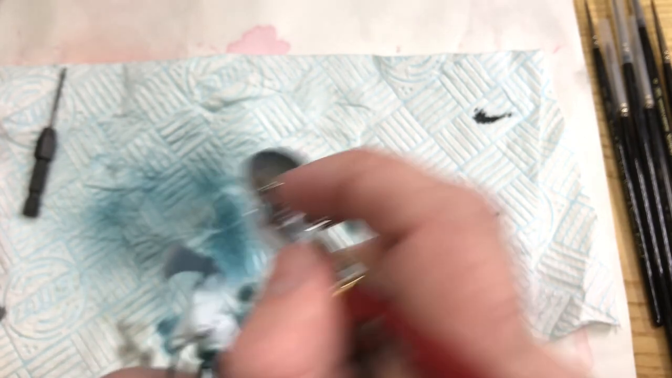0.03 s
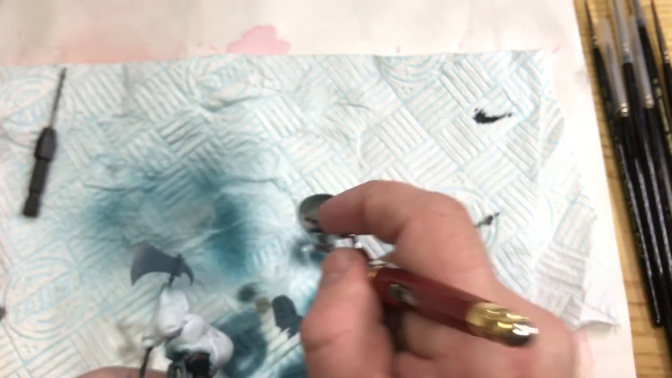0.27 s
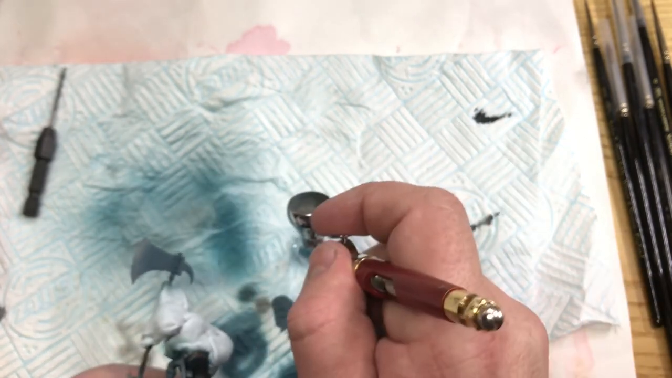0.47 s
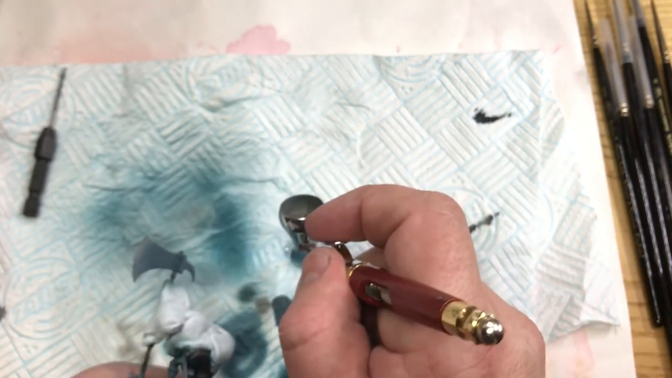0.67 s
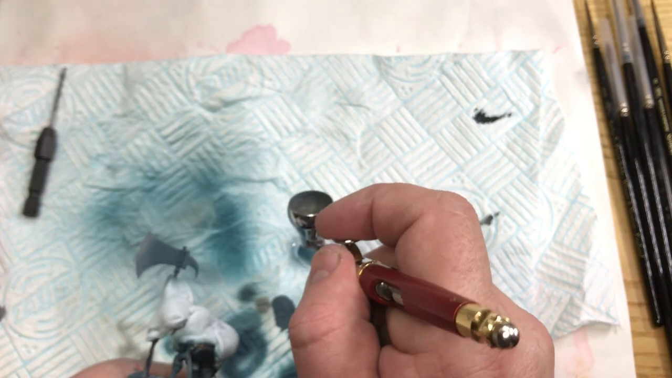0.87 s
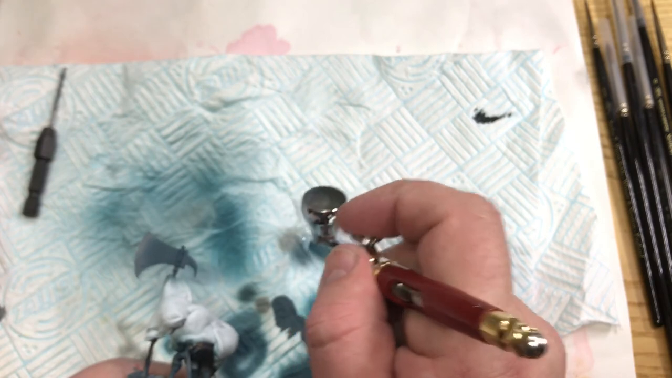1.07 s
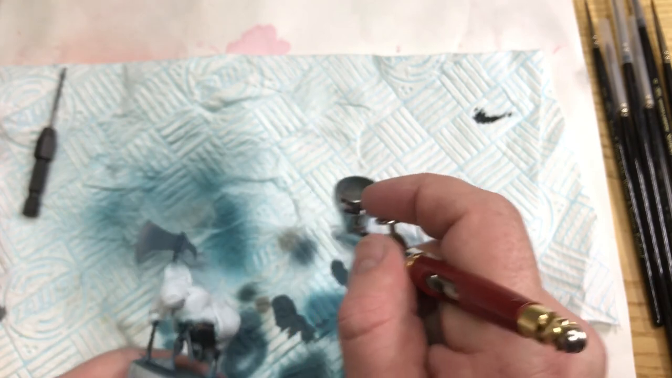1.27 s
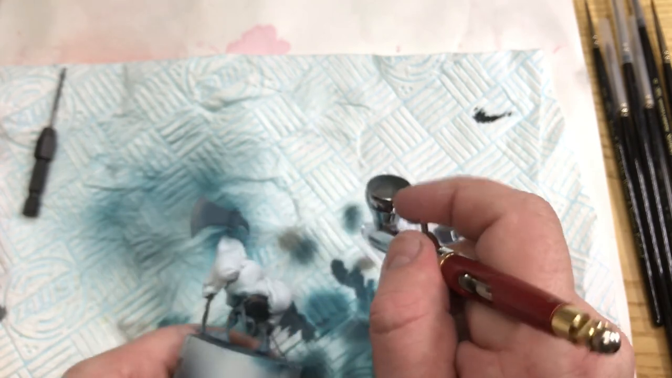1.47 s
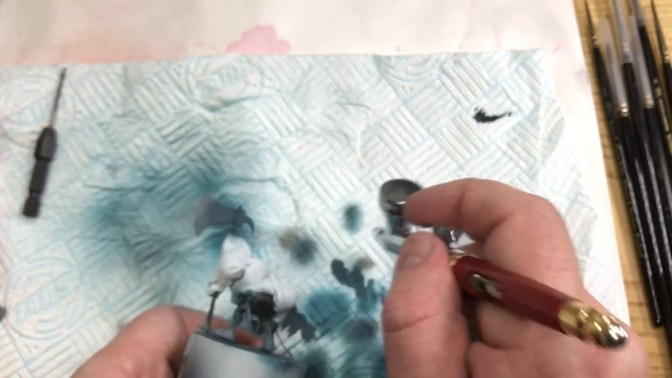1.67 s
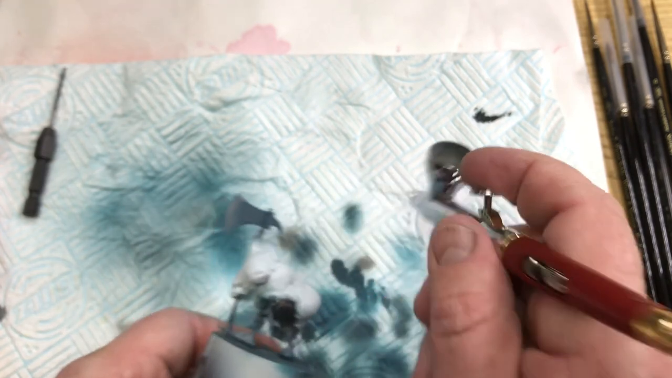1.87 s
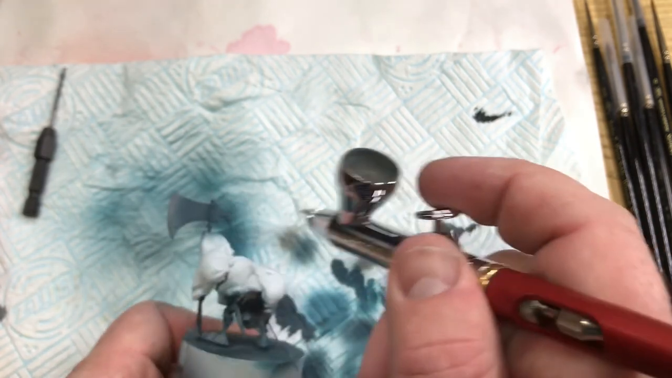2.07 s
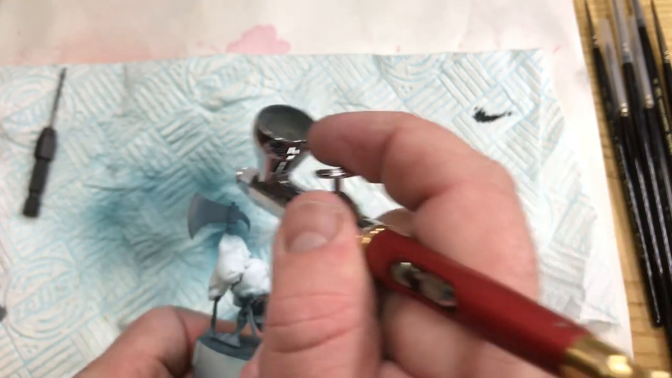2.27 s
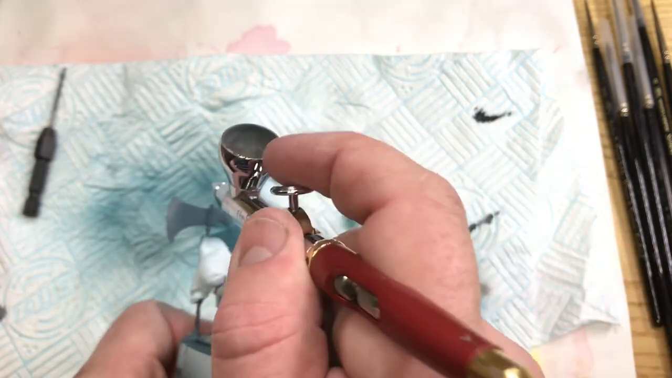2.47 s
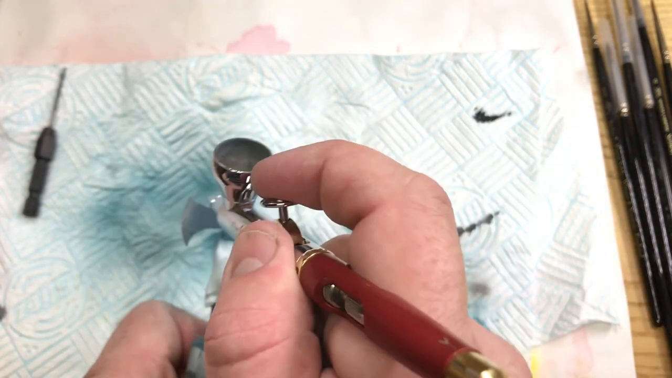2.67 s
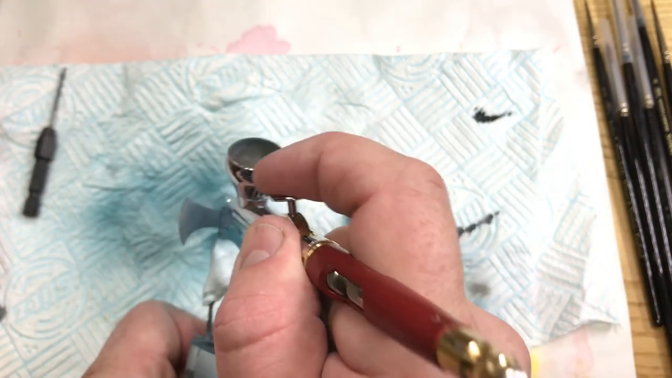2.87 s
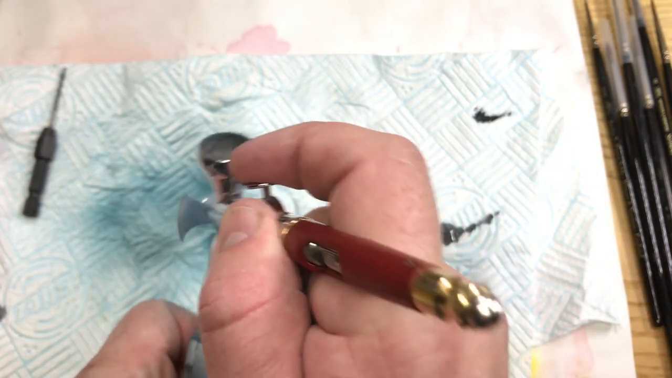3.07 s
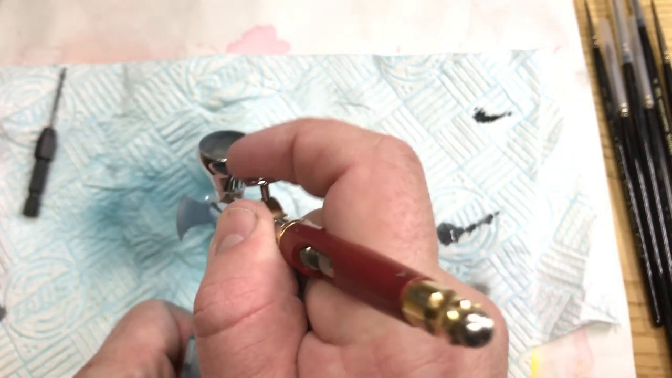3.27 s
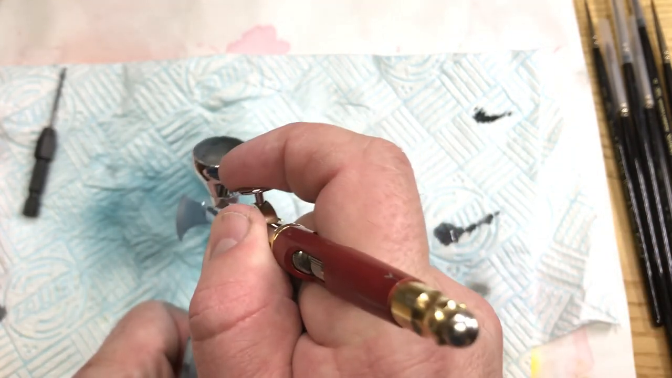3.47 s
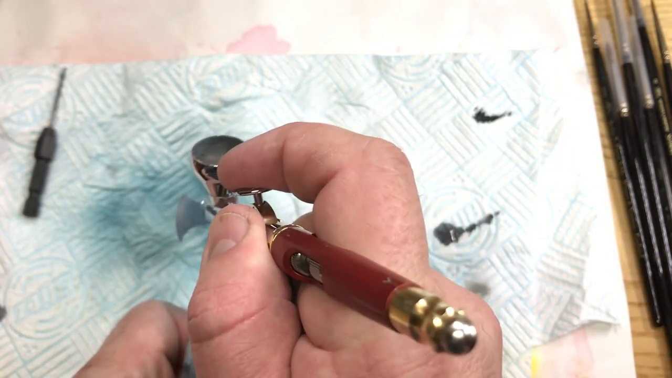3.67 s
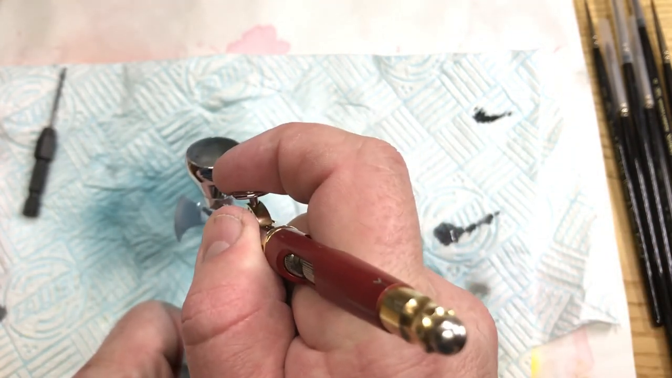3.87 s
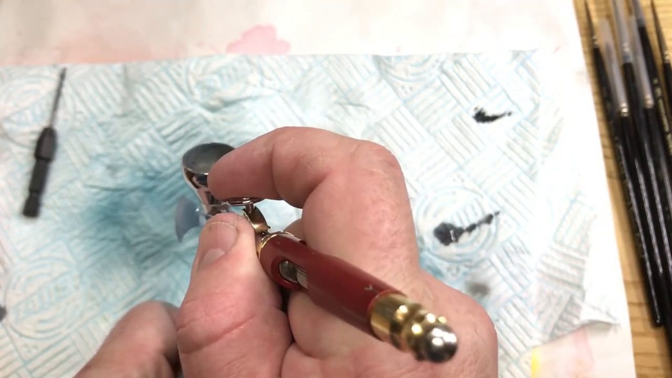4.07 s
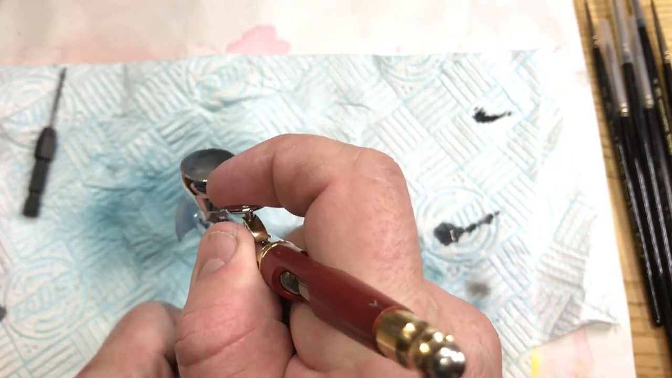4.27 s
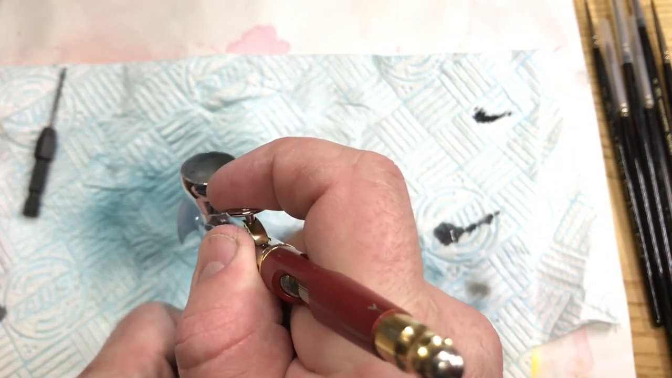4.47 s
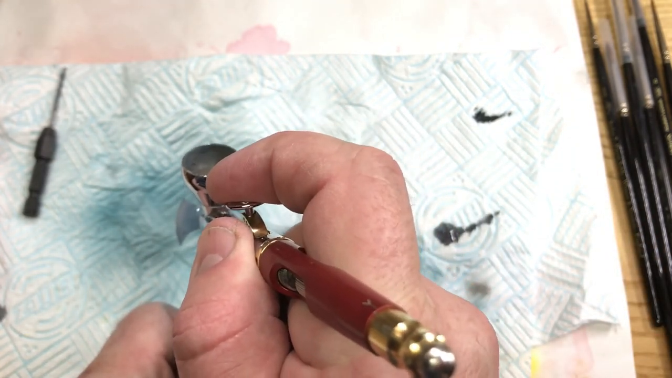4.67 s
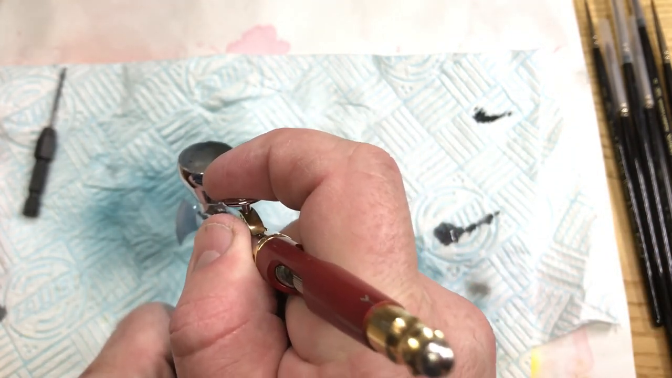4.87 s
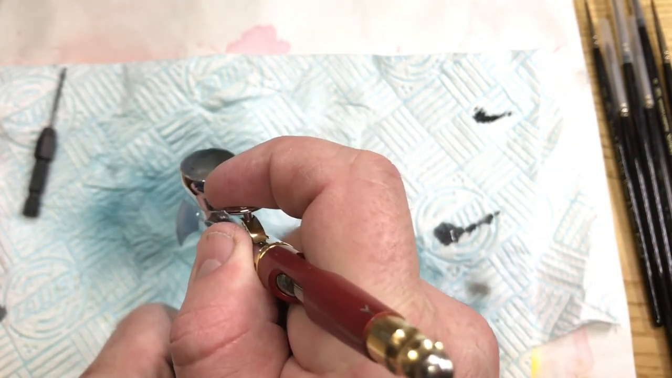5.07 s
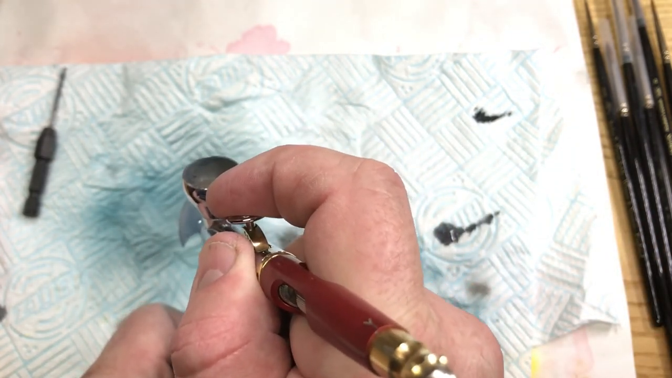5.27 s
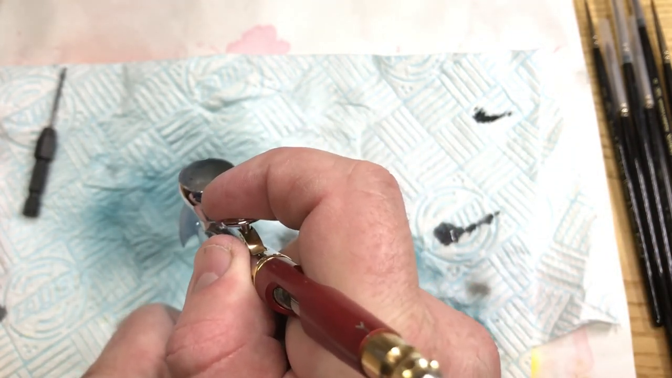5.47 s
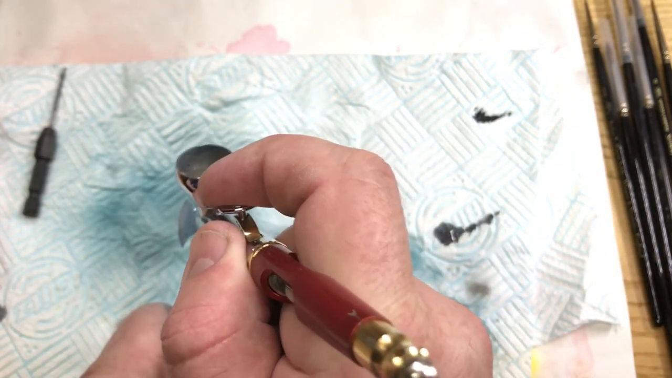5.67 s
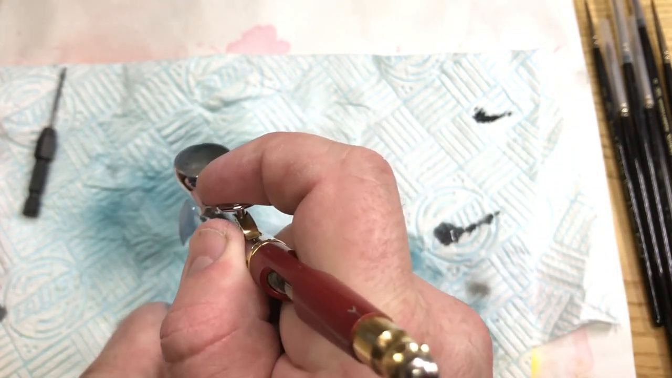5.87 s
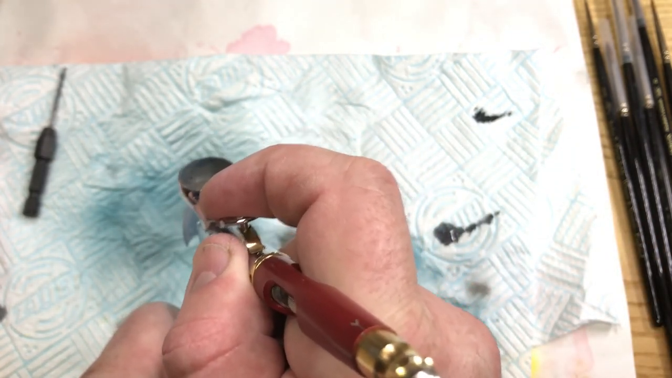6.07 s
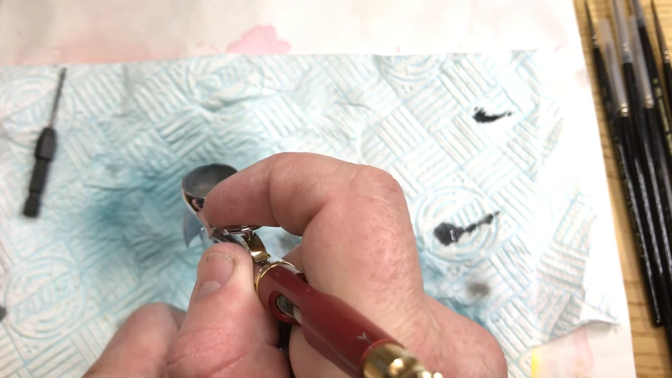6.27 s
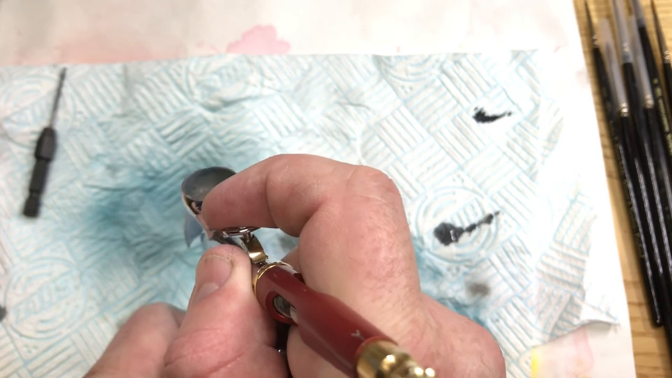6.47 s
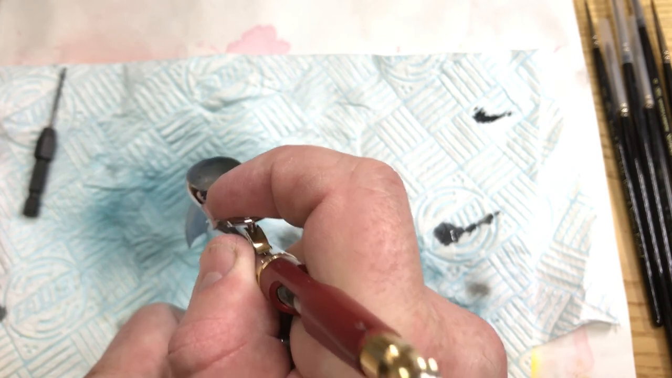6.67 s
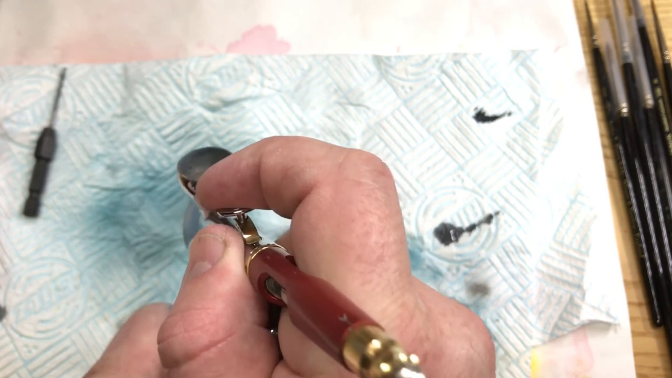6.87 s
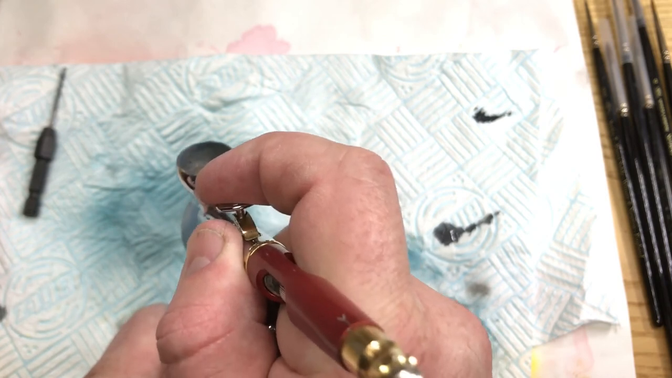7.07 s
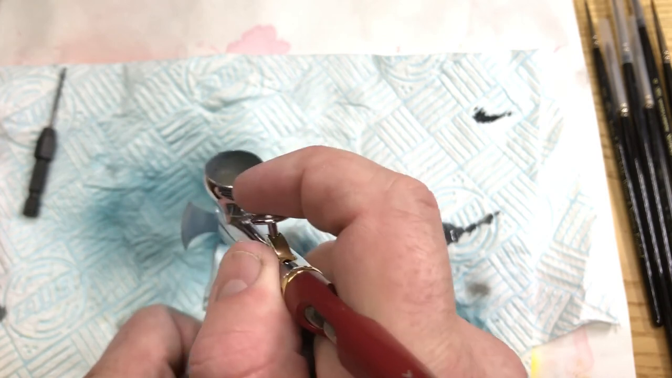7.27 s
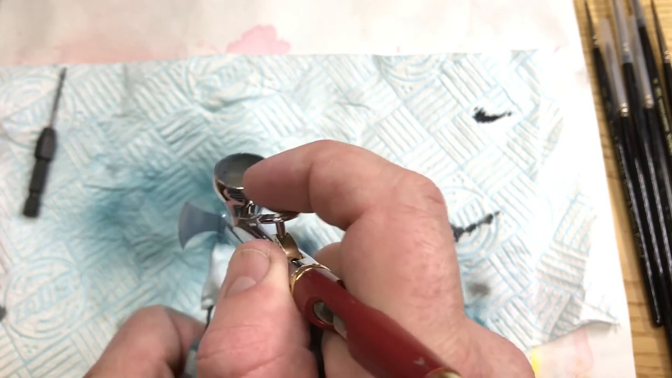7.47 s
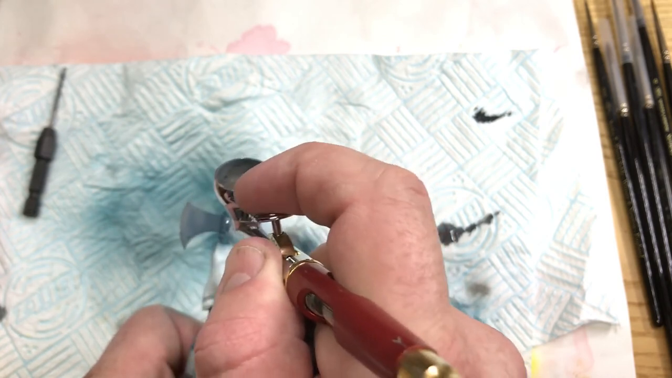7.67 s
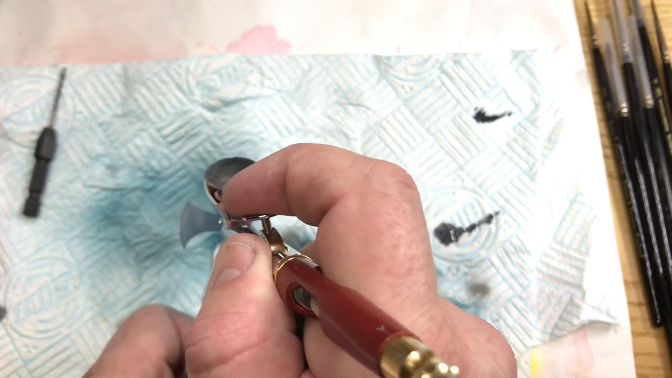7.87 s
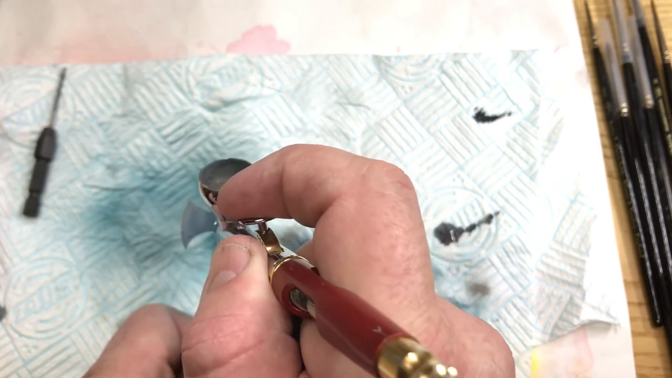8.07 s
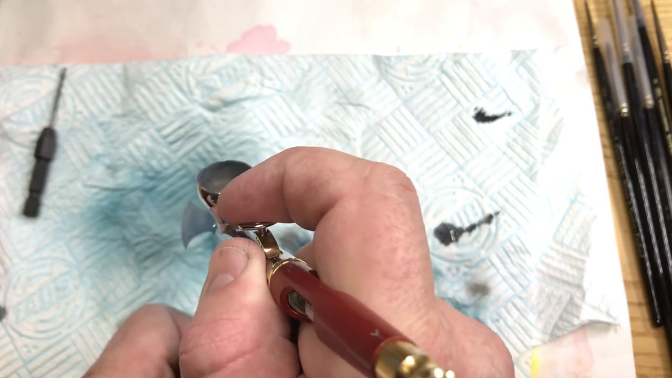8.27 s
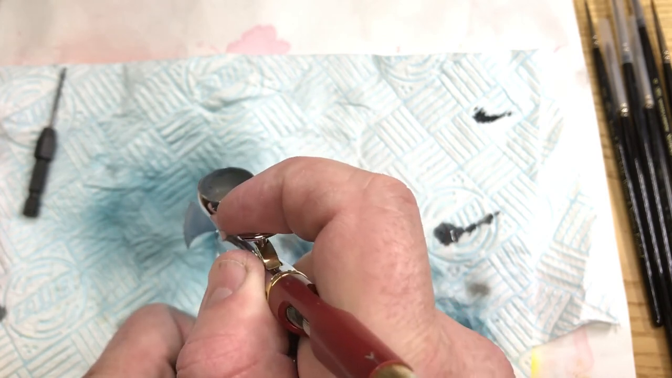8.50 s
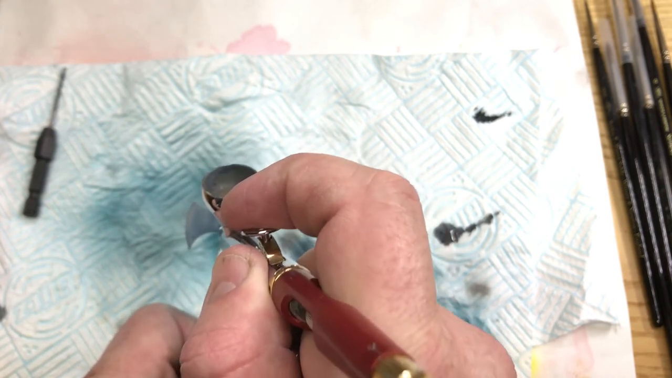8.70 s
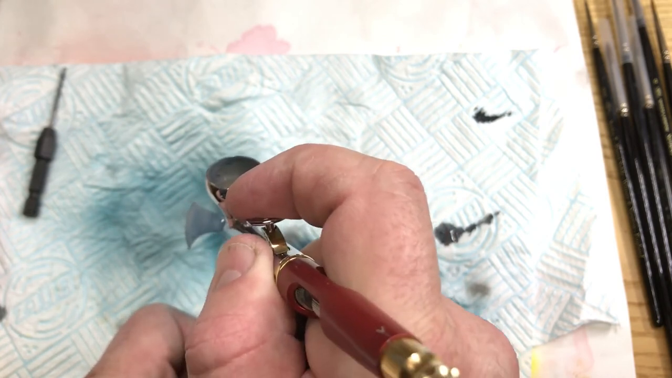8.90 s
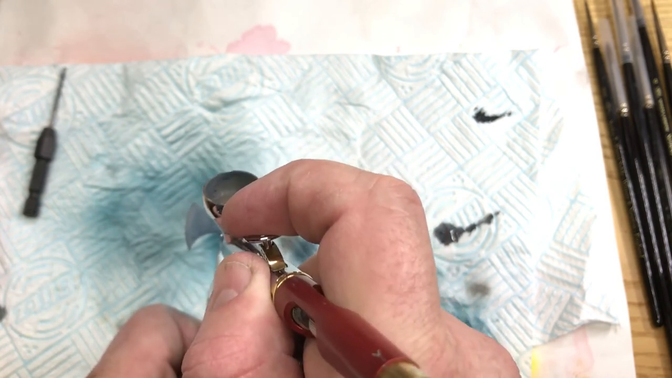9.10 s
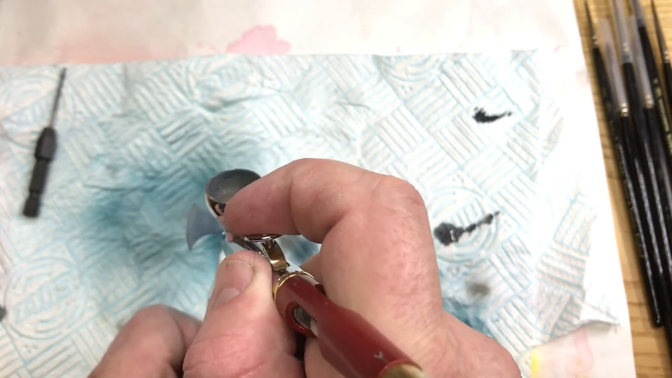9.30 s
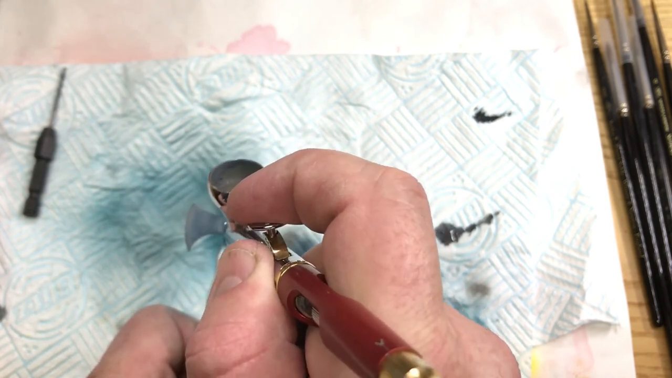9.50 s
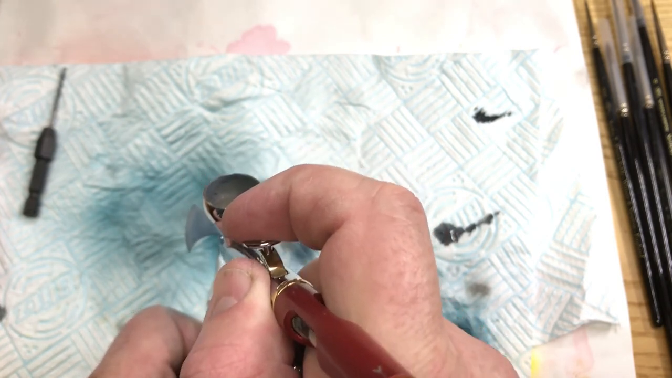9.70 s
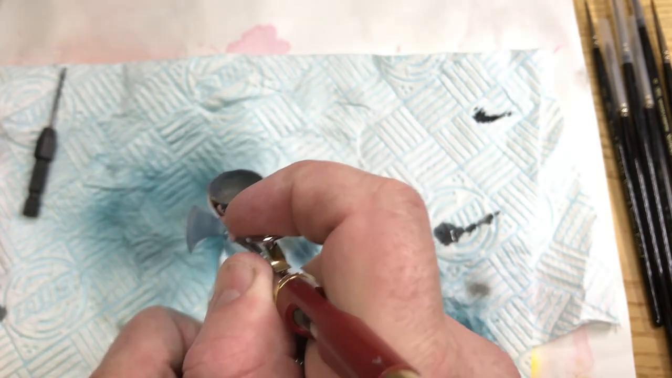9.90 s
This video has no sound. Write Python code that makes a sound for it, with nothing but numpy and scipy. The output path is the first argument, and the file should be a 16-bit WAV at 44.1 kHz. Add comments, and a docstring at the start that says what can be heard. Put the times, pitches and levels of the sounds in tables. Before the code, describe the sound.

An airbrush hisses in short puffs, then long wavering sprays, over a chugging small piston compressor and faint hand ticks and bumps in a quiet room.

```python
"""Leaking air and ticking hands, then three airbrush puffs on a paper towel: filtered noise gated by a trigger.
A piston compressor cuts in during the first puff to refill its tank: shaking crank, buzz, whistle and valves.
It vents and stops before the long passes over a small model begin, where paint strokes brighten the hiss.
The compressor soon returns and runs to the end; more bumps follow.
A dull, quiet room of coloured noise lies under everything."""
import sys
import numpy as np
from scipy import signal
from scipy.fft import rfft, irfft, next_fast_len
from scipy.io import wavfile

SR = 44100
rng = np.random.default_rng(int(sys.argv[2]) if len(sys.argv) > 2 else 0)


def int16_out(signal):
    """Quantize to a 16-bit WAV file."""
    q = np.round(np.clip(np.atleast_2d(signal).T, -1, 1) * 32767)
    wavfile.write(sys.argv[1], SR, q.astype(np.int16))


N = 438354
T = np.arange(N) / SR  # time in seconds

# Bands that set the levels of rush, roar, mist and fizz. Each row: low edge in Hz, high edge in Hz.
JET_BANDS = [(1700, 3300), (3600, 5600), (6500, 15500), (6500, 15500)]
# Colour of the jet on flat paper, then on the model. Each row: frequency in Hz, relative level in dB per Hz.
PAPER_COLOUR = [(200, -41), (700, -29), (1200, -14.5), (2000, -10), (3200, -4.5), (4000, 0), (4800, -3),
                (5700, -1.5), (7200, -7), (9200, -1.5), (10500, -8.5), (11800, -0.5), (13200, -1.5),
                (15800, -3.5)]
MODEL_COLOUR = [(200, -23), (600, -33), (1000, -15), (1650, -7.5), (2050, -11), (2750, -4.5), (3350, -20),
                (3800, -7.5), (5500, -8.5), (6050, -8), (7200, -6), (8800, -8), (10500, -8), (15800, -6)]
# Broad resonances of the nozzle over flat paper. Each row: centre in Hz, width in Hz, lift in dB.
PAPER_RESONANCES = [(3450, 250, -2), (4200, 250, 1.5), (4800, 450, -0.5), (5460, 620, 1.5)]
# Resonances of the hollow between hands and model. Each row: centre in Hz, width in Hz, lift in dB.
HOLLOW_RESONANCES = [(1280, 280, 0.5), (2390, 130, -1), (2420, 180, 1.5), (3207, 190, 9), (3560, 260, 7.5),
                     (4125, 460, 7), (4510, 52, 8), (4720, 98, 4), (4870, 200, 0), (5240, 230, 5.5),
                     (5700, 230, 3.5), (5826, 180, 2.5), (5870, 93, -3.5), (6000, 100, -7),
                     (6660, 130, 6.5), (7210, 230, 6), (7560, 110, -4.5), (7900, 510, 5), (8900, 74, 2.5),
                     (9540, 54, 10), (11200, 150, 4.5), (11730, 460, 5), (13300, 300, 6.5)]
# Presses of the trigger. Each row: down in seconds, up in seconds, seconds held half down at first,
# roar on the work in dB, paint mist in dB (both before the strokes).
PRESSES = [(0.422, 1.151, 0.022, -48.5, -40.5), (1.422, 1.591, 0, -44.5, -35.5),
           (1.638, 1.775, 0, -43.5, -37.5), (3.033, 3.209, 0.083, -35.5, -33.5),
           (3.548, 7.229, 0, -35, -33), (8.067, 9.98, 0.15, -37.5, -32)]
MODEL_FROM_S = 2.5  # presses from here on aim at the model, earlier ones at the paper
OPEN_S, CLOSE_S = 0.024, 0.032  # travel of the air valve
HALF_DOWN_DB, PUSH_S = -6, .04  # a half-pressed trigger passes less air, until it is pushed home
# Paint strokes, each a surge of the hiss. Each row: start in seconds, length in seconds, rise in seconds,
# fall in seconds, added roar in dB, added mist in dB.
STROKES = [ (0.44, 0.36, 0.047, 0.18, 4.5, 7), (0.987, .22, 0.047, .03, 5, 6),
           (3.113, 0.11, 0.023, 0.071, 4, 12.5), (3.557, .1, 0.015, 0.085, 6.5, 9.5),
           (3.647, 0.59, 0.035, 0.2, 3.5, 4), (3.748, 0.32, 0.051, 0.15, 6.5, 9),
           (3.99, .09, .025, .04, 6, 5.5), (4.682, 0.43, 0.17, 0.14, 6, 7.5),
           (5.256, 0.35, 0.026, 0.073, 3, 2.5), (5.642, 0.15, 0.013, 0.026, 6.5, 8.5),
           (5.785, 0.3, 0.037, 0.23, 3.5, 9), (6.027, 0.677, .38, 0.056, 6.5, 3.5),
           (6.434, 0.27, 0.093, 0.028, 1.5, 8), (6.868, .13, 0.065, 0.054, 4, 7),
           (6.975, 0.17, .02, 0.051, 2.5, 11), (7.14, 0.07, 0.027, .04, -1.5, 5.5),
           (8.21, 0.57, 0.43, 0.057, 7.5, 3), (8.6, 0.16, .1, .07, 5, 6.5),
           (8.914, 0.086, 0.038, 0.053, 6.5, 6), (9.068, 0.39, 0.1, 0.14, 8.5, 6),
           (9.482, 0.11, 0.035, 0.064, 8.5, 4), (9.686, 0.3, 0.067, 0.094, 9.5, 6), ]
# Low rush of air under an open valve. Each row: time in seconds, level in dB.
RUSH_LEVEL = [(0.45, -50.5), (0.9, -48.5), (1.1, -44.5), (1.45, -48.5), (1.75, -48), (3.15, -45.5),
              (3.9, -43), (5.2, -45), (5.9, -45), (6.35, -42), (7.2, -49), (8.25, -40.5), (8.6, -41.5),
              (8.95, -44.5), (9.9, -43)]
# How much uneven paint shakes each part. In order: shares of the flutter for rush, roar, mist and fizz.
WETNESS = (0.82, 0.22, 0.85, 0.33)
FIZZ_DB, FIZZ_GROWTH = -0.8, 1.03  # the top is weak between strokes and swells more than the mist
# Spits of paint at the nozzle. Each row: start in seconds, level in dB, decay in seconds.
SPITS = [(0.845, -33, 0.021), (8.487, -25, .001), (8.638, -19, .001), (8.667, -21, .001)]
# Colour of the spits. Each row: frequency in Hz, relative level in dB per Hz.
SPIT_COLOUR = [(2000, -10), (6500, -10), (8500, 2), (11300, 1), (13000, -5), (15800, -4)]

# Compressor shaft speed, one table a run. Each row: time in seconds, speed in turns a second.
FIRST_RUN = [(0.9, 22.915), (1.4, 22.669), (2.0, 22.56), (2.68, 22.216), (2.88, 15.0)]
SECOND_RUN = [(3.9, 22.793), (4.8, 22.73), (5.7, 22.891), (7.3, 23.085), (7.9, 22.485), (8.6, 22.557),
              (9.94, 22.817)]
# Runs of the motor. Each row: on in seconds, off in seconds, level in dB against COMPRESSOR_DB.
MOTOR_ON = [(0.88, 2.697, 1.16), (3.92, 10.0, 0.6)]
COMPRESSOR_DB = -46.5  # gain over every compressor part
SPIN_UP_S, COAST_S = .09, 0.16
# Shaking of the crank. Each row: multiple of shaft speed, relative level in dB.
CRANK_ORDERS = [(2, -16.5), (3, -6), (4, -13.5), (6, -15.5), (7, -15), (8, -16)]
# The shaking grows as the shaft slows under load.
EASY_TURNS_PER_S, SHAKE_DB_PER_LOST_TURN, MOST_SHAKE_DB = 22.8, 11, 4.5
# Moments within one turn of the crank, as a share of a turn after the top of the compression.
STRAIN_AT, OUTLET_AT, INLET_AT, INTAKE_AT = -.05, -.13, .25, -.19
# Modes of the compressor housing. Each row: centre in Hz, width in Hz, relative level in dB.
HOUSING_MODES = [(72.8, 6, 6.5), (107.3, 8.1, -3.5), (139, 18, -2.5), (175.5, 8.1, -10.5),
                 (202.8, 4.5, -8.5), (262, 37, -11), (332.3, 5.5, 2)]
# Thin motor panel that sings when the shaft labours. Each row: centre in Hz, width in Hz, relative level in dB.
PANEL_MODES = [(382, 35, -15)]
WHINE_HZ, WHINE_DB = 746, -18.5  # thin bearing whine: mean pitch, and mean level against the compressor
# Whistle of the motor: multiple of shaft speed, and when in the turn the unloaded shaft runs fastest.
WHISTLE_ORDER, FASTEST_AT = 64.5, .2
# Modes of the reed outlet valve. Each row: centre in Hz, width in Hz, relative level in dB.
OUTLET_MODES = [(1480, 66, -39), (1384, 27, 7.5), (1490, 37, 8.5)]
# Modes of the inlet, rung on the return stroke. Each row: centre in Hz, width in Hz, relative level in dB.
INLET_MODES = [(716, 630, -17), (904, 70, 9), (1000, 130, 5)]
# Colour of air drawn through the compressor. Each row: frequency in Hz, relative level in dB per Hz.
INTAKE_COLOUR = [(60, 2), (200, -0.5), (550, -4.5), (850, 4.5), (1150, -3.5), (1450, -2), (1800, -11.5),
                 (3200, -9), (5500, -13.5), (9000, -12), (10300, -18), (11200, -15), (14300, -16),
                 (15800, -19)]
# Pipe resonances of that air. Each row: centre in Hz, width in Hz, lift in dB.
PIPE_RESONANCES = [(2266, 34, 13.7), (3100, 34, 10.4), (4160, 38, 11), (6700, 300, 2.2), (11100, 310, 5),
                   (13500, 400, 5)]

# Small escapes of air. Each row: start in seconds, end in seconds, level in dB.
LEAKS = [(0.085, 0.223, -61.5), (2.474, 2.645, -79), (2.69, 2.78, -65), (3.203, 3.59, -66.5)]
# Colour of the leaks. Each row: frequency in Hz, relative level in dB per Hz.
LEAK_COLOUR = [(500, -3), (2000, -1), (4200, -1), (6000, -3), (8200, -6), (10400, -8), (13500, -4),
               (15800, -15)]
# Puffs of the unloader valve as the motor stops. Each row: start in seconds, level in dB, decay in seconds.
VENTS = [(2.639, -35.5, 0.015), (2.666, -46, 0.0092)]
# Colour of those puffs. Each row: frequency in Hz, relative level in dB per Hz.
VENT_COLOUR = [(1500, -11), (3500, -14), (5000, 0), (6500, -5), (8200, 9), (10500, -9), (13700, 3),
               (15800, -5)]

# Soft bumps of the hands on the desk. Each row: time in seconds, peak in dB.
BUMPS = [(0.322, -44), (0.705, -41), (3.239, -34), (6.387, -33)]
# Modes of the desk. Each row: frequency in Hz, decay in seconds, relative level in dB.
DESK_MODES = [(170, 0.015, -6), (275, 0.004, -1.5), (376, 0.0055, 1.5), (530, 0.0061, -1.5),
              (633, 0.0046, -3.5), (910, 0.004, -17)]
# Ticks of the trigger. Each row: start in seconds, level in dB, decay in seconds.
TICKS = [(0.277, -48, 0.0024), (0.309, -59, .0015), (0.368, -48, 0.0018), (0.411, -37.5, 0.0025),
         (2.765, -61, .0015), (2.971, -55, 0.0026)]
# Colour of the ticks. Each row: frequency in Hz, relative level in dB per Hz.
TICK_COLOUR = [(600, -25), (2000, -8), (2700, 1), (5000, 2), (9000, -9), (15800, 7)]
# Fingers shifting their grip. Each row: start in seconds, end in seconds, level in dB.
GRIPS = [(-0.02, 0.27, -56), (0.316, 0.338, -47.5)]
# Colour of rubbing skin. Each row: frequency in Hz, relative level in dB per Hz.
SKIN_COLOUR = [(50, 7), (160, 2), (300, -5), (500, 0.5), (700, -8), (950, -4), (1500, -8), (2200, -29),
               (8000, -31)]

# Colour of the quiet room. Each row: frequency in Hz, relative level in dB per Hz.
ROOM_COLOUR = [(30, 1.5), (60, 16), (100, 1.5), (170, 4), (280, -7.5), (450, -2), (700, -9), (950, -4),
               (1500, -16.5), (2200, -17), (4000, -23.5), (7000, -26), (10500, -28.5), (15500, -33)]
ROOM_DB = -56
# Faint hollow swells near 500 Hz. Each row: start in seconds, end in seconds, level in dB.
ROOM_SWELLS = [(2.62, 3.08, -58.5), (3.25, 3.65, -67), (5.28, 6.2, -56.5), (7.2, 7.62, -54.5),
               (7.95, 8.42, -55.5)]
EDGE_HZ = 15830  # top of the whole mix


def jet(presses, points, peaks, flutter_db, tremor_db):
    """Turbulent hiss in four parts: the rush of air, its roar on the work, the paint mist and its fizz on top."""
    n = next_fast_len(N)
    hz = np.fft.rfftfreq(n, 1 / SR)
    hiss = rfft(rng.standard_normal(n)) * shape(hz, points, peaks)
    # Smooth crossovers divide the spectrum into four shares.
    above_rush, above_roar, above_mist = (1 / (1 + (edge_hz / (hz + 1)) ** 12) for edge_hz in (3350, 6100, 8900))
    shares = [1 - above_rush, above_rush - above_roar, above_roar - above_mist, above_mist]
    flutter = flutter_db * waver(rate_hz=70)  # the paint feeds unevenly
    gains = trigger(presses, tremor_db)
    out = 0
    for share, (low_hz, high_hz), gain, wetness in zip(shares, JET_BANDS, gains, WETNESS):
        band_rms = irfft(hiss * (hz > low_hz) * (hz < high_hz), n).std()
        part = irfft(hiss * share, n)[:N] / band_rms
        out = out + part * gain * amp(wetness * flutter)
    return out


def trigger(presses, tremor_db):
    """Gains of rush, roar, mist and fizz: each press opens the air, each stroke swells the upper three."""
    surge_db = np.zeros((2, N))
    for start, length, rise, fall, roar_db, mist_db in STROKES:
        stroke = gate(start, start + length, rise, fall)
        surge_db = np.maximum(surge_db, np.outer([roar_db, mist_db], stroke))
    held = np.zeros((4, N))
    for down, up, half_s, roar_db, mist_db in presses:
        # A half press counts only if it outlasts the opening of the valve.
        half_down = np.clip((down + half_s - T) / PUSH_S + .5, 0, 1) * (half_s > OPEN_S)
        valve = gate(down, up, OPEN_S, CLOSE_S) * amp(HALF_DOWN_DB * half_down)
        held += np.outer(amp([0, roar_db, mist_db, mist_db]), valve)
    tremor = tremor_db * waver(rate_hz=22)  # the hand trembles, so the jet strikes unevenly
    roar = surge_db[0] + tremor
    mist = surge_db[1] + .5 * tremor
    return held * amp([curve(RUSH_LEVEL), roar, mist, FIZZ_DB + FIZZ_GROWTH * mist])


def reflections(x, echo_db, drift_s, count=8):
    """Desk, hands and model return the hiss; the fine comb shifts as the hands move."""
    delays = rng.uniform(.001, .011, count)
    signs = rng.choice([-1, 1], count)
    fine = signal.resample_poly(x, 4, 1)  # finer steps keep the moving delays clean
    fine_t = np.linspace(0, N / SR, len(fine), endpoint=False)
    echoes = 0
    for delay, sign in zip(delays, signs):
        moving_delay = delay + drift_s * waver(rate_hz=1.2)
        echoes = echoes + sign * np.interp(T - moving_delay, fine_t, fine)
    return x + amp(echo_db) * echoes / np.sqrt(count)


def compressor(crank_db=0.5):
    """Motor and valves sound while the power is on; the shaking crank spins up and coasts down."""
    turns, speed, turning = shaft()
    crank = sum(amp(db) * np.cos(2 * np.pi * (k * turns + rng.random())) for k, db in CRANK_ORDERS) * np.sqrt(2)
    load_db = np.minimum(SHAKE_DB_PER_LOST_TURN * (EASY_TURNS_PER_S - speed), MOST_SHAKE_DB)
    spinning = sum(amp(db) * gate(on, off + COAST_S, SPIN_UP_S, COAST_S) for on, off, db in MOTOR_ON) * turning
    powered = sum(amp(db) * gate(on, off, 0.078, 0.013) for on, off, db in MOTOR_ON)
    shaking = amp(crank_db + load_db) * crank * spinning
    motor_sound = powered * (motor(turns, speed, turning) + turning * whistle(turns))
    return amp(COMPRESSOR_DB) * (shaking + motor_sound + valves(turns, powered))


def shaft():
    """Turns made by the crank, its speed in turns a second, and 1 while it turns."""
    turns, turning, speed = np.zeros((3, N))
    for rows, first_stroke in ((FIRST_RUN, .38), (SECOND_RUN, .67)):  # turns to the first compression
        inside = (T >= rows[0][0]) & (T <= rows[-1][0])
        run_speed = inside * curve(rows)
        speed += run_speed
        turns += inside * (np.cumsum(run_speed) / SR - first_stroke)
        turning += inside
    return turns, speed, turning


def beat(turns, at, sharpness):
    """A smooth pulse of height 1, once in every turn."""
    return np.exp(sharpness * (np.cos(2 * np.pi * (turns - at)) - 1))


def motor(turns, speed, turning, buzz_db=-5.5, panel_db=-13.0, stroke_sharpness=2.5, labour_db=14, slip_db=4):
    """Each compression strains the motor, so its 100 Hz buzz pulses; a slower shaft makes its panel sing louder."""
    mains = sum(np.cos(2 * np.pi * 100 * k * T) for k in range(1, 4))
    strain = beat(turns, STRAIN_AT, stroke_sharpness) * amp(1.9 * waver(rate_hz=25)) * turning
    buzz = amp(buzz_db) * ring(mains * strain, HOUSING_MODES)

    labour = np.clip(22.6 - speed, -.25, .25)  # lost turns a second
    slots = np.cos(2 * np.pi * 17.5 * turns) * beat(turns, 2 * STRAIN_AT, 2) * turning
    singing = ring(slots * amp(slip_db * slip(turns)), PANEL_MODES)
    panel = amp(panel_db + labour_db * labour + 1.35 * waver(rate_hz=20)) * singing

    whine_hz = WHINE_HZ + 2 * waver(rate_hz=8.2)
    whine = amp(WHINE_DB + 2 * waver(rate_hz=6.4)) * np.sin(2 * np.pi * np.cumsum(whine_hz) / SR)
    return buzz + panel + whine


def slip(turns):
    """The 100 Hz pull of the mains drifts against the crank, about nine beats a second at speed: -1 to 1."""
    return np.cos(2 * np.pi * (100 * T - 4 * turns + .4))


def whistle(turns, whistle_db=-17.5, swing_db=2, ripple=.55, whistle_sharpness=0.61):
    """The shaft speeds up after every compression, so the motor's whistle chirps upward once a turn."""
    chirp = ripple * np.sin(2 * np.pi * (turns - FASTEST_AT))
    cycles = WHISTLE_ORDER * turns + chirp + .15 * waver(rate_hz=60)
    chirps = unit(np.sin(2 * np.pi * cycles) * beat(turns, 0, whistle_sharpness))
    return amp(whistle_db + swing_db * waver(rate_hz=16)) * chirps


def valves(turns, powered, outlet_db=-18, inlet_db=-15.5, intake_db=-8.5, outlet_sharpness=6, inlet_sharpness=5,
           outlet_share=.8, inlet_share=0.56, gulp_db=2.5, steady_share=0.25):
    """Outlet and inlet valves rattle in turn, each shaking the other; air is gulped once a turn, unevenly."""
    outlet_clack = beat(turns, OUTLET_AT, outlet_sharpness)
    inlet_clack = beat(turns, INLET_AT, inlet_sharpness)
    outlet_force = steady_share + outlet_clack + inlet_share * inlet_clack
    inlet_force = steady_share + inlet_clack + outlet_share * outlet_clack
    outlet = unit(ring(rng.standard_normal(N), OUTLET_MODES) * outlet_force * powered)
    inlet = unit(ring(rng.standard_normal(N), INLET_MODES) * inlet_force * powered)
    gulp = (2 * beat(turns, INTAKE_AT, 0.92) * (1 + 0.3 * waver(rate_hz=20)) - .7) * gulp_db
    rattle_db = 0.88 * waver(rate_hz=45) + waver(rate_hz=110) + gulp
    intake = noise(INTAKE_COLOUR, PIPE_RESONANCES) * amp(rattle_db) * powered
    return amp(outlet_db) * outlet + amp(inlet_db) * inlet + amp(intake_db) * intake


def leaks():
    """Air seeps faintly, and the compressor vents briefly as it stops."""
    seep = swells(LEAKS, rise=.011, fall=0.059)
    vents = taps(VENTS, VENT_COLOUR, rise=.004)
    return noise(LEAK_COLOUR) * seep * amp(0.51 * waver(rate_hz=60)) + vents


def hands():
    """Desk bumps, short noise ticks of the trigger, and the soft rub of skin shifting its grip."""
    ticks = taps(TICKS, TICK_COLOUR, rise=0.00037)
    grips = swells(GRIPS, rise=.008, fall=0.019) * noise(SKIN_COLOUR)
    return bumps() + ticks + grips


def bumps():
    """A soft push sets the heavily damped desk ringing for a moment."""
    t = np.arange(SR // 10) / SR
    thud = np.zeros(len(t))
    for k, (hz, decay, db) in enumerate(DESK_MODES):
        thud += (-1) ** k * amp(db) * np.sin(2 * np.pi * hz * t) * np.exp(-t / decay)
    pushes = np.zeros(N)
    for s, db in BUMPS:
        pushes[round(s * SR)] = amp(db)
    return signal.oaconvolve(pushes, thud / abs(thud).max())[:N]


def room():
    """Dull, gently wavering background noise with a faint hollow swell."""
    hollow = ring(ring(rng.standard_normal(N), [(499, 220, 0)]), [(550, 200, 0)])
    background = amp(ROOM_DB + 0.88 * waver(rate_hz=12)) * noise(ROOM_COLOUR)
    return background + swells(ROOM_SWELLS, rise=0.071, fall=0.09) * hollow


def reverberate(x, wet_db, t60):
    """A small furnished room: a short diffuse tail after the direct sound."""
    t = np.arange(SR // 2) / SR
    tail = rng.standard_normal(len(t)) * amp(-60 * t / t60) * (t > .004)
    return x + amp(wet_db) * signal.oaconvolve(x, tail / np.linalg.norm(tail))[:N]


def taps(rows, points, rise):
    """Short bursts of noise that die away without ringing."""
    envelope = np.zeros(N)
    for s, db, decay in rows:
        age = np.clip(T - s, 0, 40 * decay)
        envelope += amp(db) * np.minimum(age / rise, 1) * np.exp(-age / decay)
    return noise(points) * envelope


def swells(rows, rise, fall):
    """One rise, hold and fall for each row."""
    return sum(amp(db) * gate(start, end, rise, fall) for start, end, db in rows)


def ring(x, modes):
    """Passes x through parallel resonances, kept dark above the highest one, at rms 1."""
    out = 0
    for hz, width, db in modes:
        r = np.exp(-np.pi * width / SR)
        pole = r * np.exp(2j * np.pi * hz / SR)
        out = out + amp(db) * signal.lfilter([1 - r], [1, -pole], x).imag
    top_hz = 1.25 * max(hz for hz, _, _ in modes)
    return unit(signal.sosfilt(signal.butter(3, top_hz, fs=SR, output="sos"), out))


def noise(points, peaks=(), size=N):
    """Coloured noise of rms 1."""
    n = next_fast_len(size)
    spectrum = rfft(rng.standard_normal(n)) * shape(np.fft.rfftfreq(n, 1 / SR), points, peaks)
    return unit(irfft(spectrum, n)[:size])


def shape(hz, points, peaks=()):
    """Gain of a smooth spectrum with resonances standing out of it, thinned below its first point."""
    f, db = np.transpose(points)
    smooth_db = np.interp(np.log(hz + 1), np.log(f), db)
    lift_db = sum(lift / (1 + (2 * (hz - centre) / width) ** 2) for centre, width, lift in peaks)
    return amp(smooth_db + lift_db) / np.sqrt(1 + (.8 * f[0] / (hz + 1)) ** 8)


def waver(rate_hz):
    """Random drift of rms 1: straight lines between rate_hz chance points a second."""
    points = rng.standard_normal(4000)
    return unit(np.interp(T * rate_hz, np.arange(len(points)), points))


def gate(start, end, rise, fall):
    """Opens and shuts with straight ramps."""
    return np.clip((T - start) / rise, 0, 1) * np.clip((end - T) / fall, 0, 1)


def curve(rows, t=T):
    """Joins rows of time and value by straight lines."""
    return np.interp(t, *np.transpose(rows))


def unit(x):
    """Scales to rms 1."""
    return x / np.sqrt(np.mean(x ** 2) + 1e-20)


def amp(db):
    """Decibels to gain."""
    return 10 ** (np.asarray(db) / 20)


def scene():
    """All sources at one microphone, the same in both channels."""
    on_paper = [press for press in PRESSES if press[0] < MODEL_FROM_S]
    on_model = [press for press in PRESSES if press[0] >= MODEL_FROM_S]
    puffs = jet(on_paper, PAPER_COLOUR, PAPER_RESONANCES, flutter_db=1.2, tremor_db=-1.2)
    passes = jet(on_model, MODEL_COLOUR, HOLLOW_RESONANCES, flutter_db=1.01, tremor_db=1.07)
    spits = taps(SPITS, SPIT_COLOUR, rise=.0005)
    spray = reflections(puffs + passes + spits, echo_db=-10.5, drift_s=.00005)
    near = reverberate(spray + leaks() + hands(), wet_db=-28.0, t60=0.27)
    mono = near + compressor() + room()
    return np.array([mono, mono])


def record(dry):
    """A steep low-pass ends the treble at EDGE_HZ."""
    low_pass = signal.firwin(1023, EDGE_HZ, window=("kaiser", 9), fs=SR)
    return signal.oaconvolve(dry, low_pass[None], "same")


dry = scene()
out = record(dry)
int16_out(out)
```